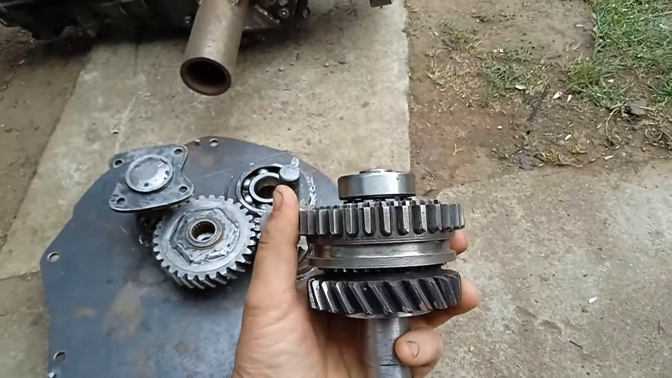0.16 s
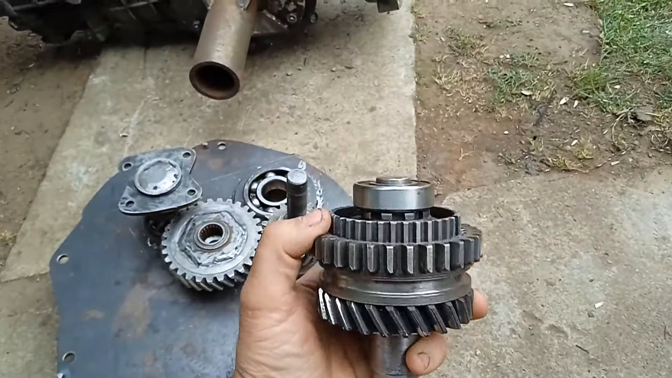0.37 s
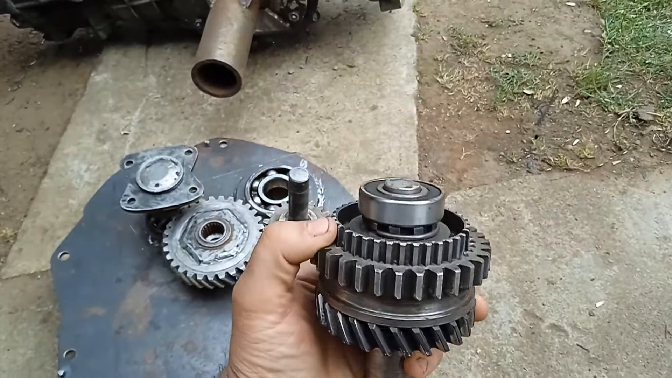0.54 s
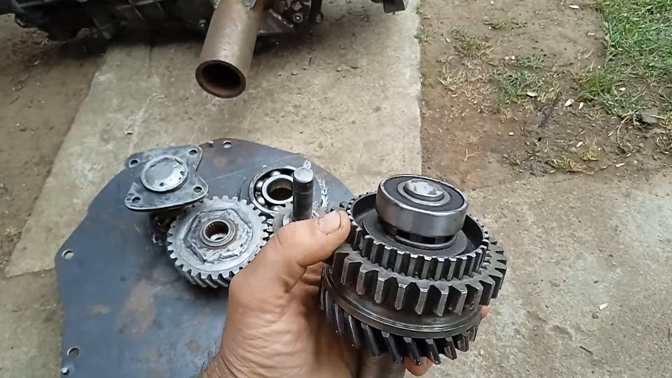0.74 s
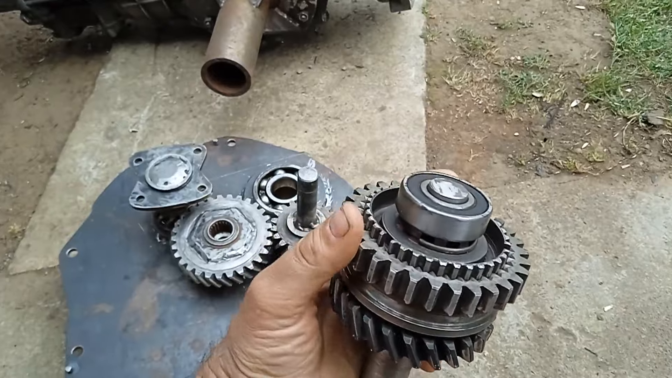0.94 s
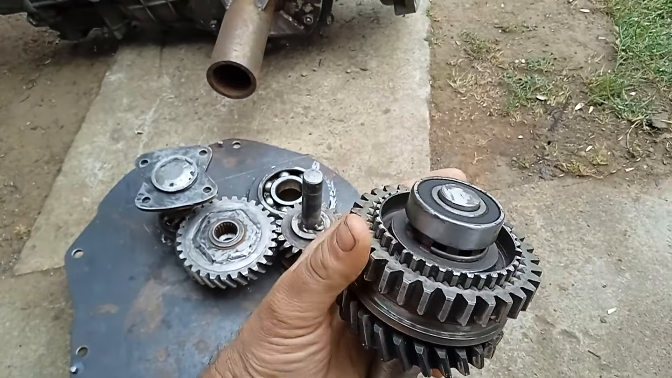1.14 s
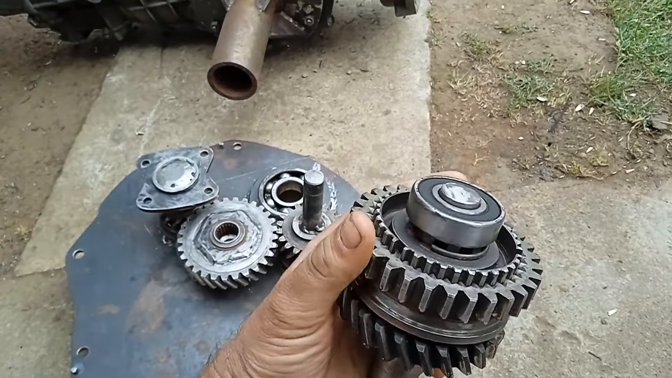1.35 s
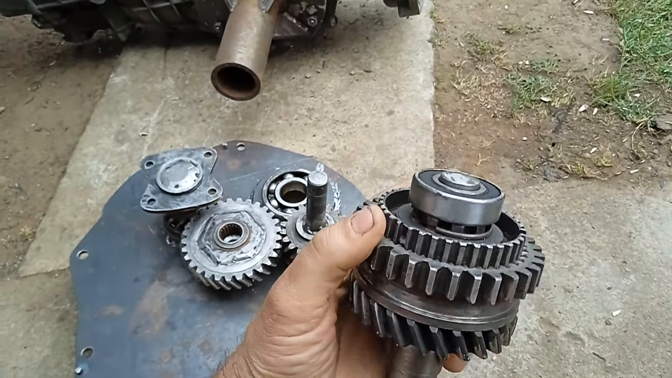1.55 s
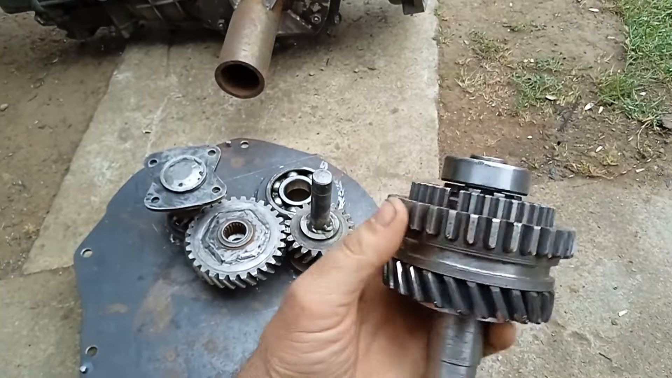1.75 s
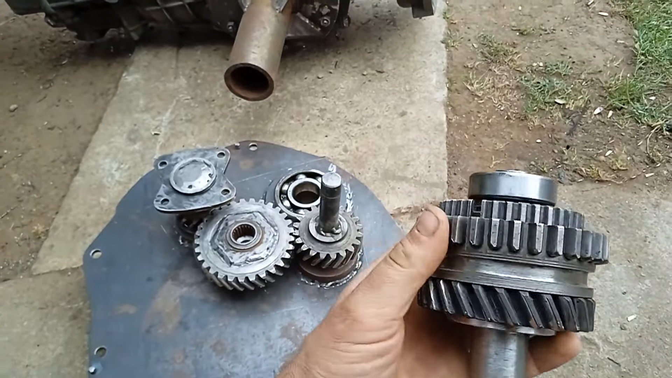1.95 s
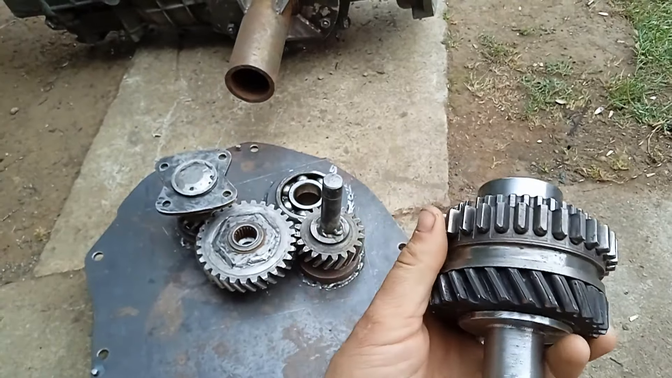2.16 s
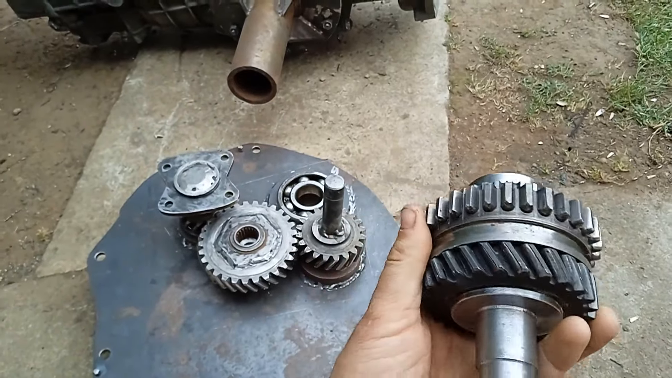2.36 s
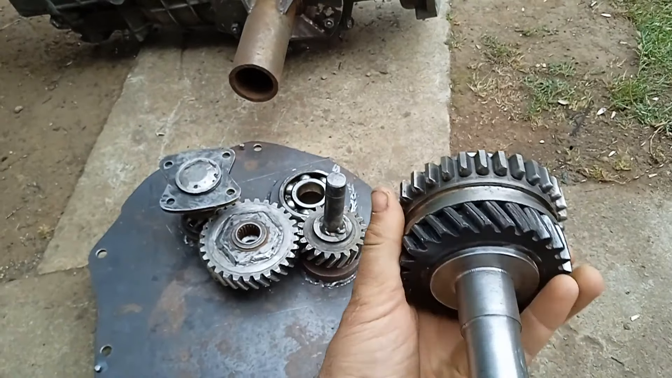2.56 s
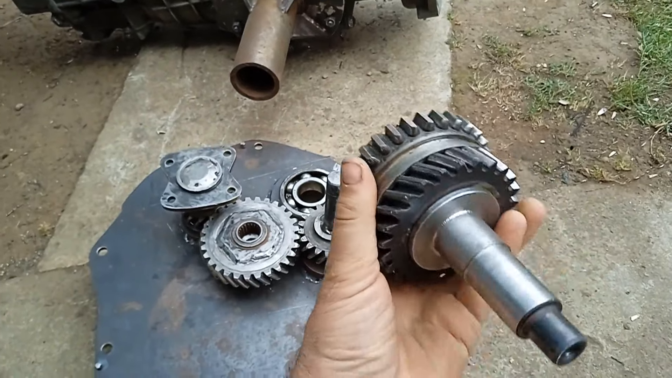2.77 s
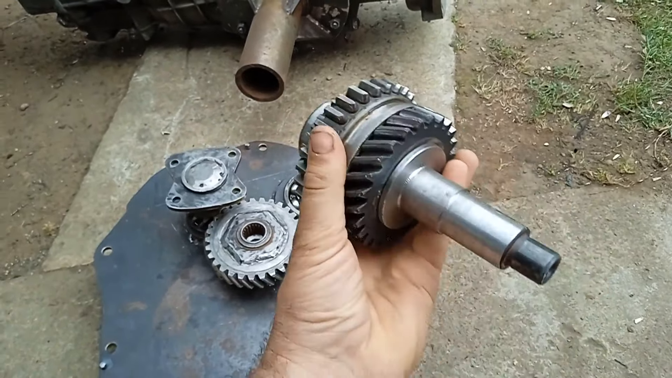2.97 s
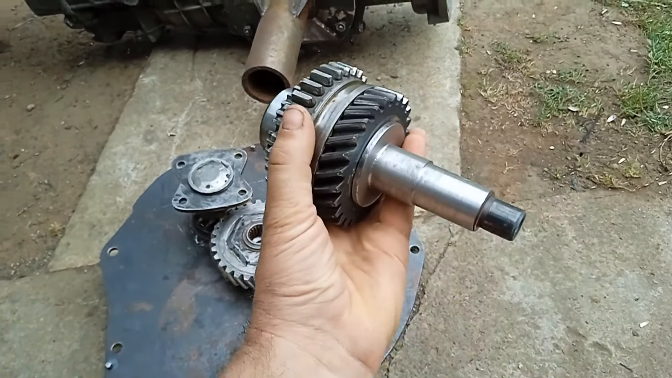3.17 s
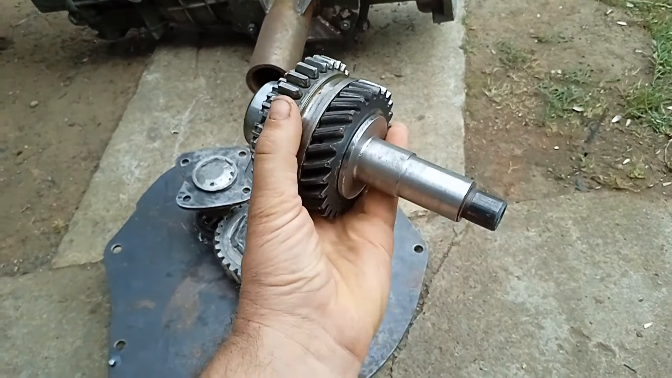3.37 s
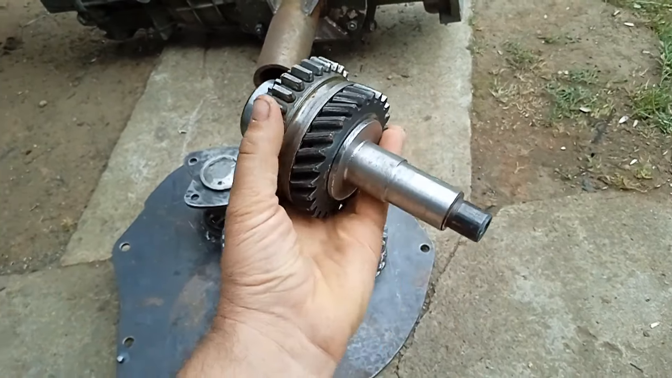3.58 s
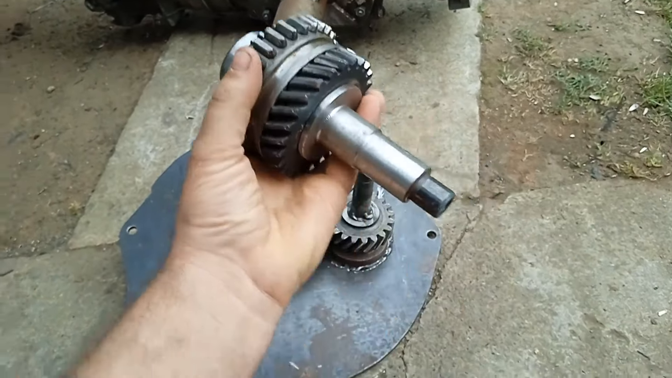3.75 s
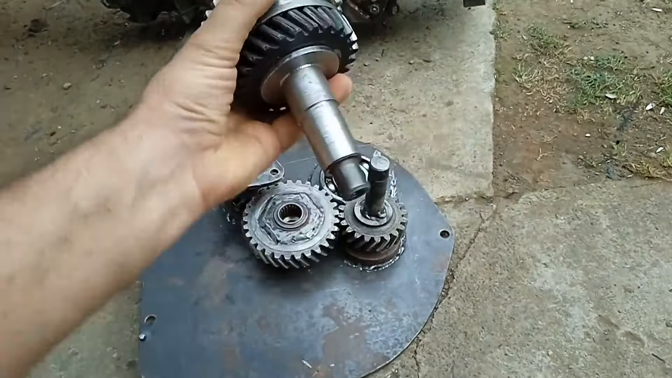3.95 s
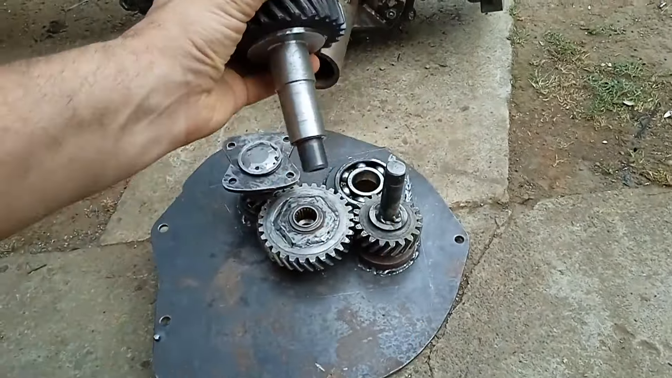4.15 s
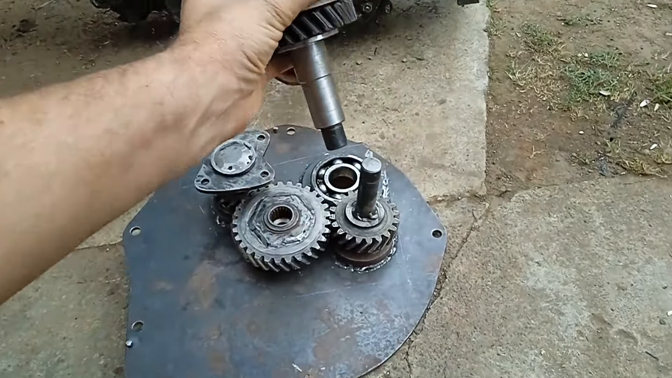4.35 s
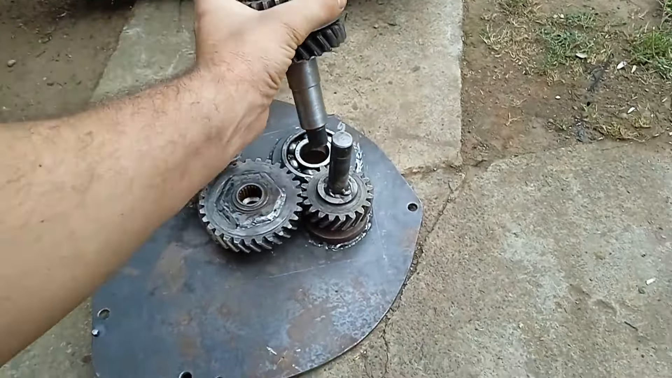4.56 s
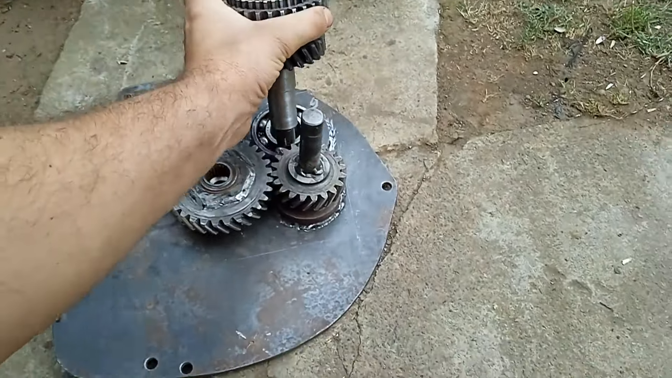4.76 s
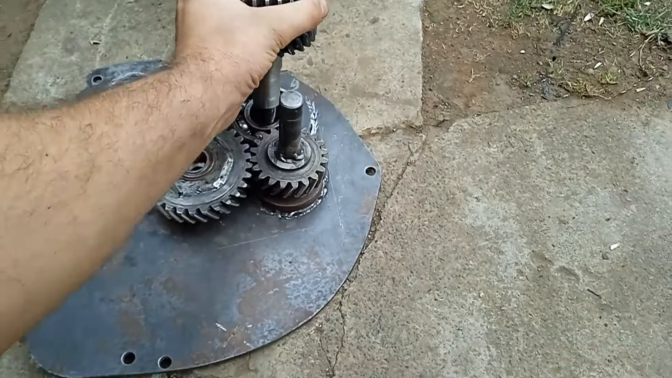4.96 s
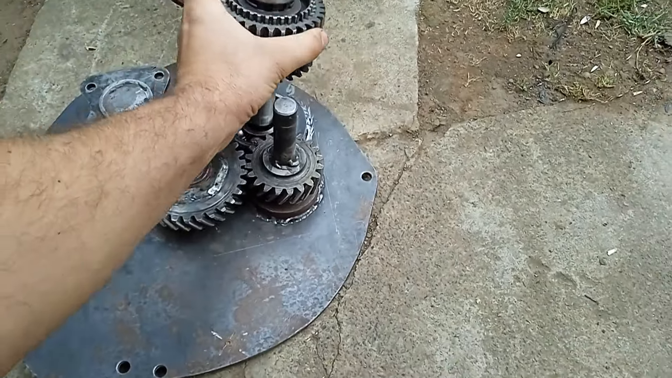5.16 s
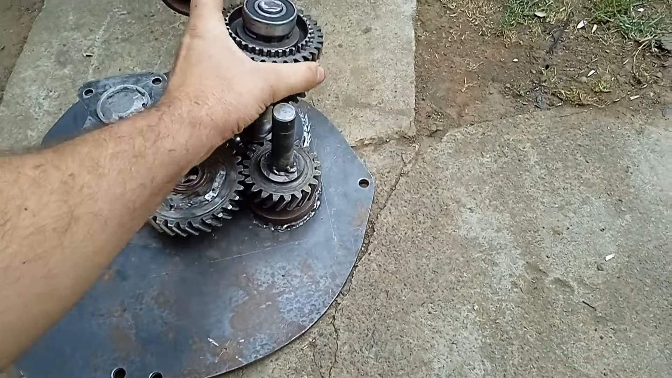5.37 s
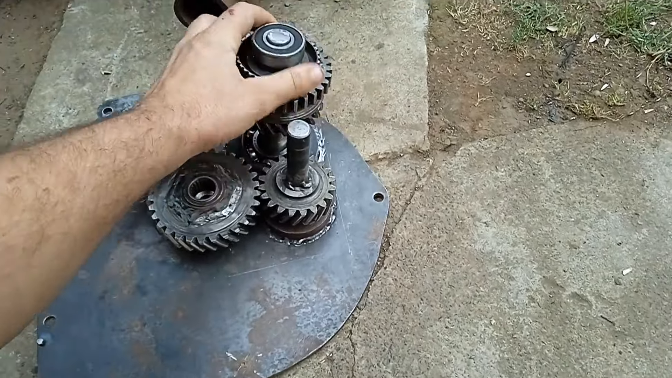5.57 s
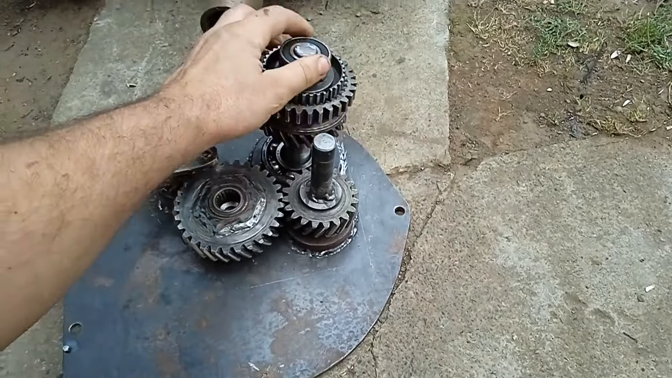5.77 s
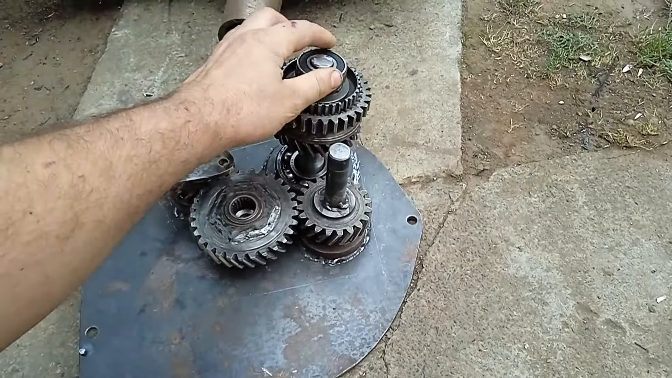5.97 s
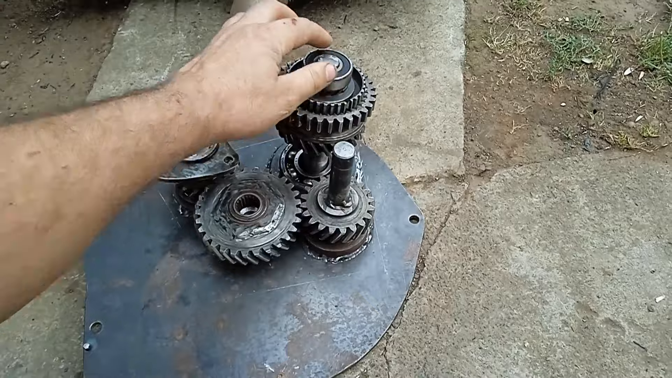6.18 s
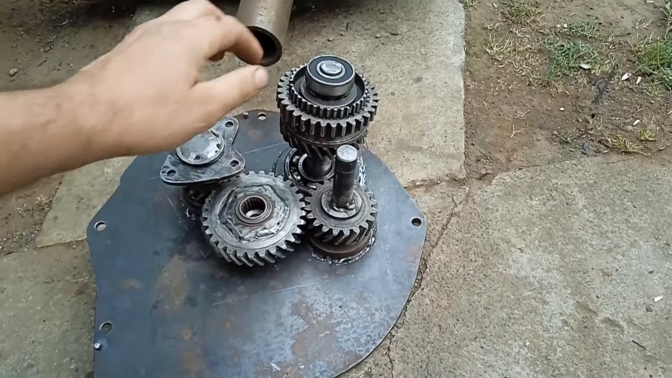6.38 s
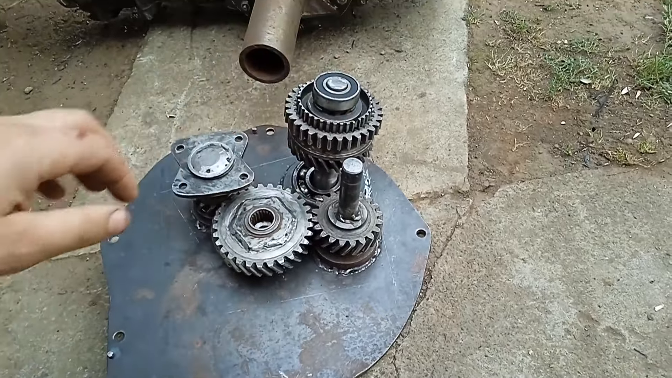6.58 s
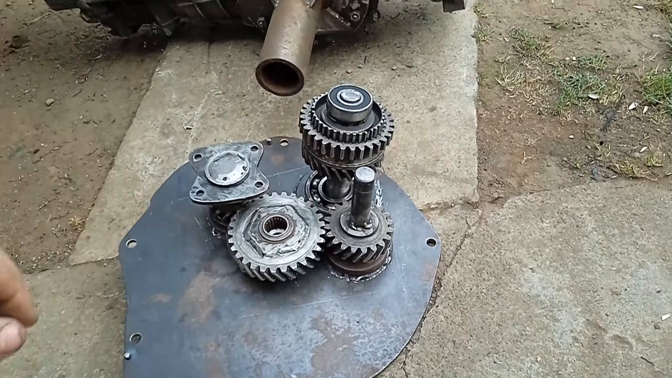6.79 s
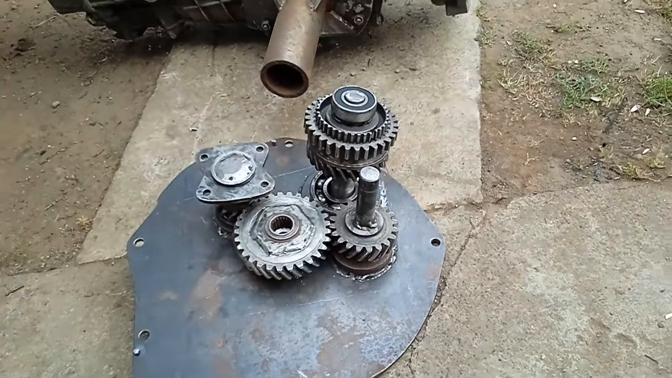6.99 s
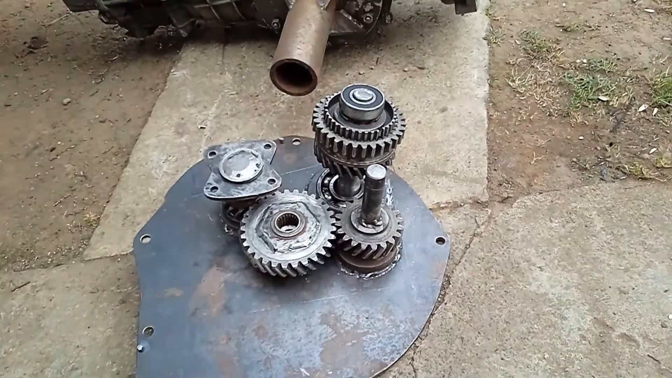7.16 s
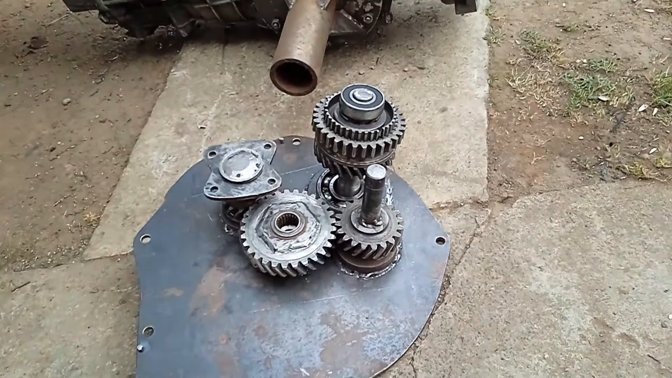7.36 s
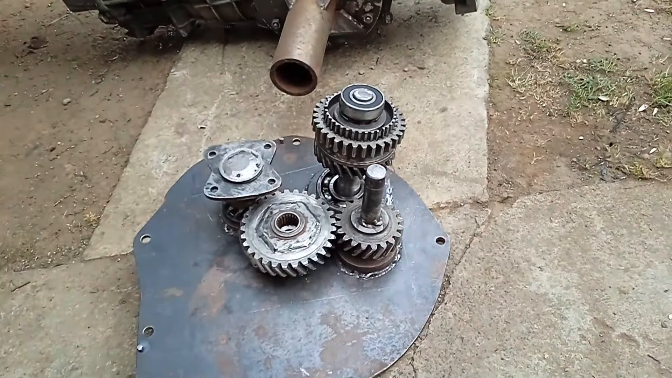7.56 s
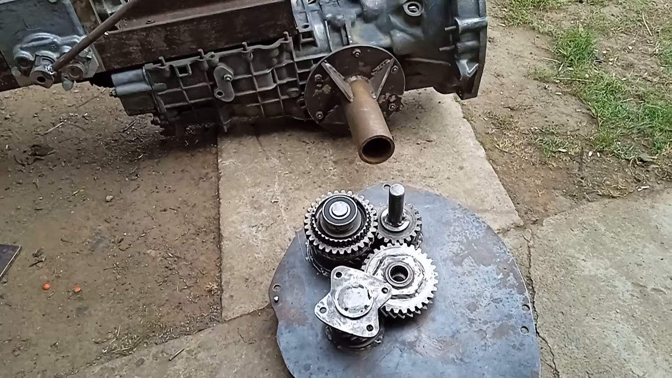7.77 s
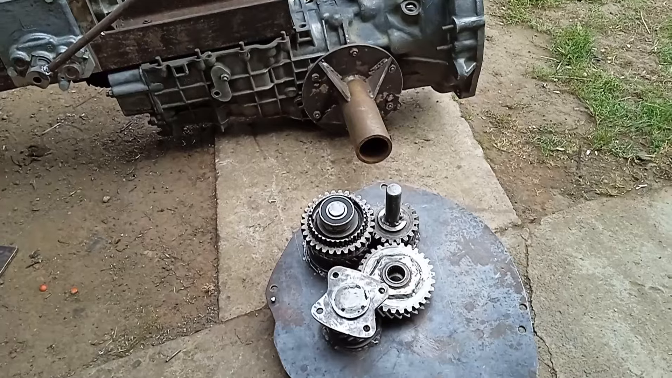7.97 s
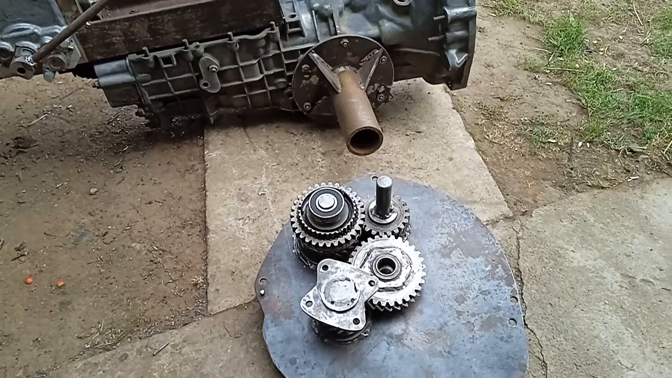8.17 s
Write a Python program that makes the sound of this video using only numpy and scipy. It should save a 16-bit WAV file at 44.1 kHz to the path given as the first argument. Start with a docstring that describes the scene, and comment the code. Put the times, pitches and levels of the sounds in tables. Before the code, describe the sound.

Quiet hiss and air puffs, a sharp ringing gear clink, small metallic ticks, then two solid steel knocks with clatter before sudden silence.

```python
"""Faint hiss and puffs of air are heard first, then loose steel gears slip and clink on a shaft turned in the hand.
In an open yard the shaft is fed into a bearing on a steel plate: it ticks and scrapes, drops home
in two knocks, and the gears clash once more. The microphone is bumped and the sound cuts out.
Steel is a sum of decaying sine modes excited by blows; cracks, clatter and air are coloured noise;
scraping is a random train of slips through the plate's modes."""
import sys
import numpy as np
from scipy import signal
from scipy.fft import rfft, irfft, next_fast_len
from scipy.io import wavfile

SR = 44100
rng = np.random.default_rng(int(sys.argv[2]) if len(sys.argv) > 2 else 0)


def log_audio(samples):
    """Write samples as a 16-bit WAV file to the path given in sys.argv[1]."""
    # one column per channel
    frames = np.atleast_2d(samples).T
    # limit to full scale, then quantise
    limited = np.clip(frames, -1, 1)
    pcm = np.round(limited * 32767).astype(np.int16)
    wavfile.write(sys.argv[1], SR, pcm)


N = 362805
TIME = np.arange(N) / SR   # s
AGE = np.arange(SR // 2) / SR   # time since a blow, s

# Spectrum of the hiss. Each row: frequency in Hz, gain in dB.
HISS = [(700, -21), (1200, -14), (1700, -1), (2300, 0.5), (3200, -1), (4700, -6.5), (6300, -1.5),
        (6900, -5.5), (8100, -22.5), (10300, -22), (13400, -32.5), (15100, -19), (16000, -21.5)]
# Spectrum of the low outdoor air. Each row: frequency in Hz, gain in dB.
YARD = [(25, -18), (70, 2), (130, 3), (350, -0.5), (650, -4), (1100, -4.5), (1500, -4), (2200, -36)]
# The strongest air puffs on the microphone. Each row: centre in seconds, length in seconds, level in dB.
PUFFS = [(0.09, 0.069, -56.5), (0.512, 0.034, -56), (2.086, 0.067, -52.5), (2.257, 0.057, -61),
         (2.691, 0.032, -52.5), (2.919, 0.016, -50.5), (3.07, 0.077, -65), (4.08, 0.043, -61.5)]
# Spectrum of puffs and draught. Each row: frequency in Hz, gain in dB.
PUFF = [(25, -10.5), (60, 3.5), (100, 4), (160, -7.5), (300, -32), (800, -40.5)]
HISS_START_DB, HISS_SINK_DB_PER_S, HISS_REST_DB = -54, 3.5, -68
YARD_START_DB, YARD_SINK_DB_PER_S, YARD_REST_DB = -63, 6, -70.5
# a weak draught rises and falls while the shaft is turned over
DRAUGHT_S, DRAUGHT_LENGTH_S, DRAUGHT_DB = 2.4, .5, -68
GUSTS_PER_S, GUST_DB = 4.1, 5

# Meetings of the loose gears. Each row: start in seconds, crack level in dB, crack t60 in seconds,
# sleeve level in dB, gear ring level in dB at each of the four RING_HZ, ring length as a share of the free ring.
CLINKS = [(0.8887, -36, 0.035, -25, -36, -51, -29.5, -51, 0.66),
          (2.0255, -9.5, 0.012, -28.5, -28.5, -33.5, -16, -17, 0.89),
          (5.7932, -35.5, 0.023, -58, -36.5, -32, -65, -66, 0.26),
          (6.06, -40.5, 0.0091, -44.5, -41, -24, -58, -58.5, 0.5),
          (6.1248, -33.5, 0.11, -45, -60.5, -59.5, -67.5, -70, .5),
          (6.1297, -28, 0.028, -31, -21, -27.5, -29.5, -37.5, 0.58),
          (6.21, -64, .05, -58, -57, -76, -65, -83, 1.4)]
# Frequencies, in Hz, between which the gear ring levels are interpolated.
RING_HZ = [3500, 5500, 8700, 13000]
# Modes of the freely ringing gears. Each row: frequency in Hz, relative level in dB, t60 in seconds.
GEAR = [(1825, -30, .2), (2330, -17, .16), (3424, -8, .27), (3440, -2, .1), (3472, -3, .15),
        (3601, -12, .18), (3703, -11, .19), (3755, -10, .07), (5425, -2, .11), (5501, -9, .31),
        (5604, -10, .09), (5884, -14, .1), (6258, -9, .06), (8680, -22, .13), (8728, -21, .23),
        (8748, 2, .05), (10090, -22, .12), (10492, -19, .1), (12378, -13, .095), (13252, -10, .07),
        (13678, -16, .115), (14591, -10, .07), (15668, -18, .12)]
# Spectrum of the tooth crack. Each row: frequency in Hz, gain in dB.
CRACK = [(300, -33.5), (1100, -24), (1600, -14), (2000, -4.5), (2400, -0.5), (3100, -2), (3700, 2.5),
         (4500, -10), (5300, 2), (6700, -2), (7600, -16.5), (11000, -18.5), (16000, -27)]
# Modes of the shift sleeve, damped by the fingers. Each row: frequency in Hz, relative level in dB, t60 in seconds.
SLEEVE = [(1946, -6.5, 0.047), (2220, -8, 0.028), (2524, -11.5, 0.028), (2970, -9.5, 0.03),
          (3680, 3, 0.022), (5105, -4.5, 0.026), (5340, -9, 0.048)]
# Reflections from ground and casing. Each row: delay in seconds, level in dB.
ECHOES = [(.0043, -24), (.0091, -28), (0.017, -18.5), (0.023, -20.5)]

# Duller clacks. Each row: start in seconds, level in dB, tail t60 in seconds.
CLACKS = [(1.4615, -45.5, 0.6), (3.2344, -47, 0.43)]
# Spectrum of the clacks. Each row: frequency in Hz, gain in dB.
CLACK = [(200, -12), (600, -2), (1200, -6), (2400, 5.5), (4000, -1), (6500, 3.5), (8000, -16), (16000, -35)]
# The clearest dry ticks of steel and grit. Each row: start in seconds, level in dB, centre frequency in Hz.
TICKS = [(2.2020, -39, 12000), (2.216, -37.5, 12000), (4.489, -41.5, 3760), (4.5284, -40.5, 4030),
         (4.556, -41.5, 3800), (4.621, -44, 4200), (4.6485, -40, 3770), (4.8905, -46.5, 4200),
         (5.1158, -44.5, 8000), (5.4643, -54, 10000), (5.529, -42, 3800), (5.565, -38.5, 6400),
         (6.2417, -46, 7000), (6.537, -42, 8300), (6.8347, -42.5, 4540), (7.1904, -47.5, 4620),
         (7.4209, -41, 5800), (7.29, -48, 3180), (7.4735, -39.5, 1530), (7.5387, -45, 3650)]
# Soft low bumps. Each row: start in seconds, level in dB, frequency in Hz.
BUMPS = [(2.251, -43, 192), (4.815, -46.5, 150), (5.7195, -41, 230), (7.111, -45, 151), (7.164, -51, 150),
         (7.4740, -33, 117)]
# Spans of fainter random ticks while the tip feels for the bore.
# Each row: start in seconds, end in seconds, mean level in dB, centre frequency in Hz.
FUMBLES = [(4.499, 4.75, -50.5, 3740), (5.385, 5.61, -50, 7400)]
GRIT_PER_S, GRIT_SPREAD_DB = 36, 5.5
# Treble response of the microphone to ticks and rubs. Each row: frequency in Hz, gain in dB.
MIC_TREBLE = [(100, 6), (6800, 4), (8000, -5.5), (13300, -7), (15200, 9.5), (16000, 5)]

# Light rubs on the steel. Each row: centre in seconds, length in seconds, level in dB,
# resonance in Hz, bandwidth in Hz.
RUBS = [(4.62, 0.084, -62, 6100, 5500), (5.056, 0.023, -52.5, 1570, 150), (5.076, 0.023, -61.5, 445, 90),
        (5.077, 0.033, -64, 3660, 4000), (5.518, 0.031, -61, 1080, 90), (7.065, 0.16, -64.5, 6800, 7000),
        (7.314, 0.059, -68, 4000, 6060)]
# Pushes that slide the shaft in the bearing. Each row: centre in seconds, length in seconds, level in dB.
PUSHES = [(5.525, 0.058, -71.5), (5.835, 0.078, -48.5), (5.982, 0.068, -51), (6.04, .065, -46),
          (6.18, .1, -56)]
# Spectrum of the sliding. Each row: frequency in Hz, gain in dB.
SLIDE_COLOUR = [(50, -29), (110, 4), (180, 10), (400, -4.5), (580, 1.5), (880, -19), (1080, -2.5),
                (1350, -12), (1900, -13), (3200, -25.5), (4500, -34), (6400, -28.5), (8000, -53.5)]
# Modes of the steel plate after a knock. Each row: frequency in Hz, relative level in dB, t60 in seconds.
PLATE = [(580, -15.5, 0.056), (657, -17, 0.092), (685, -7, 0.061), (1039, -1, 0.18), (1081.5, 2.5, 0.13),
         (1112, -0.5, 0.13), (1170, -7.5, 0.14), (1586, -5.5, 0.17), (1767, -14.5, 0.18), (1930, -3.5, 0.1),
         (2400, -13.5, .15), (2800, -12, 0.14)]

# Knocks of the shaft on its bearing. Each row: start in seconds, clatter level in dB, plate ring level in dB.
KNOCKS = [(5.622, -35, -44.5), (5.7427, -43, -51.5), (5.776, -33.5, -45.5), (5.7935, -31, -40),
          (5.8210, -43, -40.5), (5.9663, -58.5, -50), (6.0280, -46, -40.5), (6.0558, -31, -42.5),
          (6.1300, -30.5, -44), (6.212, -50.5, -60)]
# Spectrum of the clatter. Each row: frequency in Hz, gain in dB.
CLATTER = [(150, -1.5), (700, -3), (900, -3), (1100, -10), (1400, -3), (1900, 5), (2900, 2.5), (3600, -4.5),
           (4500, -14.5), (6300, -1), (7800, -26), (12000, -39), (16000, -27.5)]
# Drops, when the shaft's full weight lands. Each row: start in seconds, level in dB, thud frequency in Hz.
DROPS = [(5.7932, -18.5, 196), (6.0576, -12, 323.4)]
# Bending modes of the whole plate. Each row: frequency in Hz, relative level in dB, t60 in seconds.
FLEX = [(110, -15.5, .11), (163, -24.5, 0.18), (210.4, -15.5, 0.14), (324.6, -19.5, 0.16),
        (564, -26.5, 0.081), (628, -26.5, 0.18), (664, -22, 0.053)]
# Spectrum of the boom of the plate on the ground. Each row: frequency in Hz, gain in dB.
BOOM = [(40, -30), (80, -7.5), (120, -0.5), (200, -7.5), (320, 7.5), (450, -15), (660, -4.5), (900, -22),
        (2000, -54.5)]
KNOCK_THUD_DB, KNOCK_THUD_HZ = -13.5, 240   # light thud of every knock, relative to its clatter

# The muting. One row: start of silence in seconds, start of the fade back in, in seconds.
MUTE_S = (7.572, 8.12)
CUTOFF_HZ = 16900


def from_db(db):
    """Decibel law: 20 dB is a factor of ten in amplitude."""
    return 10 ** (np.asarray(db) / 20)


def rms_one(x):
    """Normalisation to unit root mean square."""
    return x / np.sqrt(np.mean(x ** 2) + 1e-20)


def add(out, s, sound):
    """Superposition: a sound joins the mix at time s."""
    start = round(s * SR)
    out[start:start + len(sound)] += sound[:N - start]


def coloured(x, spectrum):
    """Minimum-phase filtering by the folded cepstrum: causal, and white noise keeps its power."""
    size = next_fast_len(len(x) + len(AGE), True)
    hz, db = np.transpose(spectrum)
    bins_hz = np.maximum(np.fft.rfftfreq(size, 1 / SR), 1)
    gain_db = np.interp(np.log(bins_hz), np.log(hz), db)
    below_first = np.minimum(bins_hz / hz[0], 1)   # falls 6 dB per octave under the first row
    gain = rms_one(from_db(gain_db) * below_first)
    cepstrum = irfft(np.log(gain), size)
    cepstrum[1:] *= 2 * (np.arange(1, size) < size / 2)
    response = np.exp(rfft(cepstrum))
    return irfft(rfft(x, size) * response, size)[:len(x)]


def noise(spectrum, envelope):
    """Filtered noise: white noise is shaped in time, then coloured."""
    return coloured(rng.standard_normal(len(envelope)) * envelope, spectrum)


def swell(s, length):
    """Gaussian rise and fall, with length as its standard deviation."""
    return np.exp(-((TIME - s) / length) ** 2 / 2)


def swells(rows):
    """Superposed Gaussian gains; each listed length spans two standard deviations."""
    return sum(from_db(db) * swell(s, length / 2) for s, length, db in rows)


def settling(start_db, sink_db_per_s, rest_db):
    """Power sum of an exponentially sinking gain and a constant resting gain."""
    return np.hypot(from_db(start_db - sink_db_per_s * TIME), from_db(rest_db))


def drift(per_s):
    """Random fluctuation about zero: normal values, per_s to the second, joined by straight lines."""
    return np.interp(TIME * per_s, np.arange(1000), rng.standard_normal(1000))


def background():
    """Broadband noise: hiss and outdoor air settle, while draught and puffs blow on the microphone."""
    hiss = noise(HISS, settling(HISS_START_DB, HISS_SINK_DB_PER_S, HISS_REST_DB))
    air = noise(YARD, settling(YARD_START_DB, YARD_SINK_DB_PER_S, YARD_REST_DB))
    gusty_db = DRAUGHT_DB + GUST_DB * drift(GUSTS_PER_S)
    draught = from_db(gusty_db) * swell(DRAUGHT_S, DRAUGHT_LENGTH_S / 2)
    return hiss + air + noise(PUFF, draught + swells(PUFFS))


def decay(t60):
    """Exponential damping: the amplitude falls 60 dB in t60 seconds."""
    return np.exp(-np.log(1000) * AGE / t60)


def two_stage(t60, tail_db, tail_t60):
    """Double decay: a fast one gives way to a weaker, slower one."""
    return np.hypot(decay(t60), from_db(tail_db) * decay(tail_t60))


def ring(hz, t60):
    """Damped harmonic oscillator: one mode after a blow."""
    return np.sin(2 * np.pi * hz * AGE) * decay(t60)


def onset(rise_s):
    """Finite contact time: the blow builds up exponentially with time constant rise_s."""
    return 1 - np.exp(-AGE / rise_s)


def gears(tail_db=-22, tail_t60=0.17, rise_s=0.00098):
    """Modal excitation: a dense tooth crack, then rings whose strength depends on the point of contact."""
    out = np.zeros(N)
    # alternate modes of the sleeve start with opposite signs
    sleeve = sum((-1) ** k * from_db(db) * ring(hz, t60) for k, (hz, db, t60) in enumerate(SLEEVE))
    for s, crack_db, crack_t60, sleeve_db, *ring_db, free in CLINKS:
        crack = noise(CRACK, onset(rise_s) * two_stage(crack_t60, tail_db, tail_t60 * free))
        body = np.zeros(len(AGE))
        # neighbouring modes start in step, then beat against each other
        for hz, db, t60 in GEAR:
            body += from_db(db + np.interp(hz, RING_HZ, ring_db)) * ring(hz, t60 * free)
        ringing = (from_db(sleeve_db) * sleeve + body) * onset(rise_s) ** 2
        add(out, s, from_db(crack_db) * crack + ringing)
    return out


def yard_echoes(x, lowest_hz=500):
    """Early reflection without reverberation: long waves bend round the small reflectors."""
    out = x.copy()
    high_pass = signal.butter(1, lowest_hz, "high", fs=SR, output="sos")
    reflected = signal.sosfilt(high_pass, x + 1e-18)
    for s, db in ECHOES:
        add(out, s, from_db(db) * reflected)
    return out


def grit(count=40):
    """Random point process: faint ticks at uneven intervals in each fumble, as rows like TICKS."""
    rows = []
    for start, end, mean_db, hz in FUMBLES:
        times = start + (np.arange(count) + 2 * rng.random(count)) / GRIT_PER_S
        levels = mean_db + GRIT_SPREAD_DB * rng.standard_normal(count)
        rows += [(s, db, hz) for s, db in zip(times, levels) if s < end]
    return rows


def small_contacts(tick_t60=0.0073, tick_spread=1.92, tail_db=-22, tail_t60=0.077,
                   bump_cycles=5.2, clack_t60=0.11, clack_tail_db=-7):
    """Weak or damped impact: clacks, bumps and ticks that do not set the steel ringing."""
    out, ticks = np.zeros(N), np.zeros(N)
    for s, db, t60 in CLACKS:
        add(out, s, from_db(db) * noise(CLACK, two_stage(clack_t60, clack_tail_db, t60)))
    for s, db, hz in BUMPS:
        add(out, s, from_db(db) * ring(hz, bump_cycles / hz))
    for s, db, hz in TICKS + grit():
        edges_hz = [hz / tick_spread, min(hz * tick_spread, .45 * SR)]
        band = signal.butter(2, edges_hz, "band", fs=SR, output="sos")
        burst = rng.choice([-1, 1], len(AGE)) * two_stage(tick_t60, tail_db, tail_t60)
        bandwidth_gain = np.sqrt(SR / 4 / hz)   # a lower band is narrower and passes less power
        add(ticks, s, from_db(db) * bandwidth_gain * signal.sosfilt(band, burst))
    return out + coloured(ticks, MIC_TREBLE)


def resonant_noise(hz, width_hz, size):
    """Resonance: white noise through one peak, at unit rms."""
    b, a = signal.iirpeak(hz, hz / width_hz, fs=SR)
    return rms_one(signal.lfilter(b, a, rng.standard_normal(size)))


def friction(slips_per_s=600, plate_db=-7.0):
    """Stick-slip: each slip of the tight shaft is a tiny blow on the plate; light rubs only swish."""
    slips = rms_one((rng.random(N) < slips_per_s / SR) * rng.standard_normal(N))
    # the pressing shaft halves the ring
    plate = sum(from_db(db) * ring(hz, t60 / 2) for hz, db, t60 in PLATE)
    sliding = coloured(slips, SLIDE_COLOUR)
    plate_answer = rms_one(signal.fftconvolve(sliding, plate)[:N])
    scrape = sliding + from_db(plate_db) * plate_answer
    rubs = np.zeros(N)
    for s, length, db, hz, width_hz in RUBS:
        rubs += from_db(db) * swell(s, length / 2) * resonant_noise(hz, width_hz, N)
    return swells(PUSHES) * scrape + coloured(rubs, MIC_TREBLE)


def struck(modes, spread_db):
    """Modal participation: every blow gives each mode its own random strength and sign."""
    out = np.zeros(len(AGE))
    for hz, db, t60 in modes:
        strength = from_db(db + spread_db * rng.standard_normal())
        out += rng.choice([-1, 1]) * strength * ring(hz, t60)
    return out


def thud(hz, cycles=3.3, flex_db=-1, boom_db=-16, boom_t60=0.15):
    """Load through plate into ground: a short low swing, bending modes and a boom."""
    swing = 2 * ring(hz, cycles / hz)
    flex = from_db(flex_db) * struck(FLEX, 0.83)
    boom = from_db(boom_db) * noise(BOOM, decay(boom_t60))
    return swing + flex + boom


def knocks(clatter_t60=0.05, tail_db=-11, tail_t60=0.22, rise_s=0.00088, low_cut_hz=85):
    """Impact and radiation: the bearing clatters, the plate rings, and each drop adds a heavy thud."""
    out = np.zeros(N)
    for s, clatter_db, ring_db in KNOCKS:
        clatter = noise(CLATTER, two_stage(clatter_t60, tail_db, tail_t60))
        clatter = clatter + from_db(KNOCK_THUD_DB) * thud(KNOCK_THUD_HZ)
        plate = from_db(ring_db) * struck(PLATE, 2.1)
        add(out, s, (from_db(clatter_db) * clatter + plate) * onset(rise_s))
    for s, db, hz in DROPS:
        add(out, s, from_db(db) * thud(hz) * onset(rise_s))
    # a small plate radiates little deep bass
    high_pass = signal.butter(4, low_cut_hz, "high", fs=SR, output="sos")
    return signal.sosfilt(high_pass, out + 1e-18)


def scene():
    """Superposition in one channel: the large steel sounds echo; background and small contacts do not."""
    steel = gears() + friction() + knocks()
    return (background() + yard_echoes(steel) + small_contacts())[None, :]


def record(dry, low_cut_hz=38, fade_s=0.46):
    """Band limiting and gating: deep bass and top are cut; the sound is muted, then starts to fade back in."""
    high_pass = signal.butter(2, low_cut_hz, "high", fs=SR, output="sos")
    heard = signal.sosfilt(high_pass, dry)
    mute_start, fade_start = MUTE_S
    heard = heard * ((TIME < mute_start) + np.clip((TIME - fade_start) / fade_s, 0, 1))
    low_pass = signal.cheby2(16, 70, CUTOFF_HZ, fs=SR, output="sos")
    return signal.sosfilt(low_pass, heard + 1e-18)


dry = scene()
out = record(dry)
log_audio(out)
```